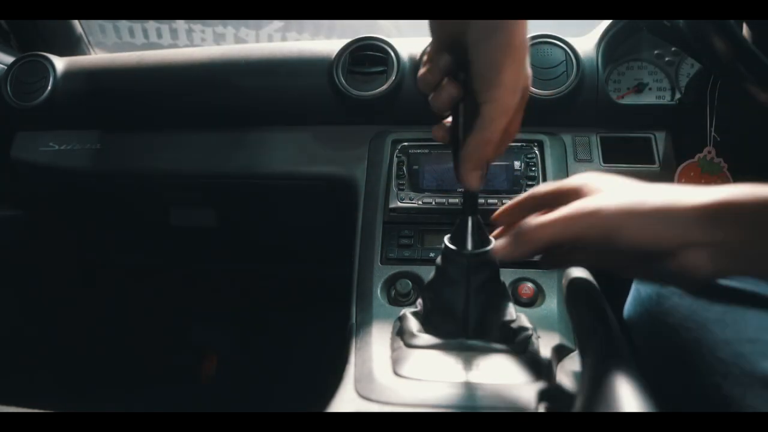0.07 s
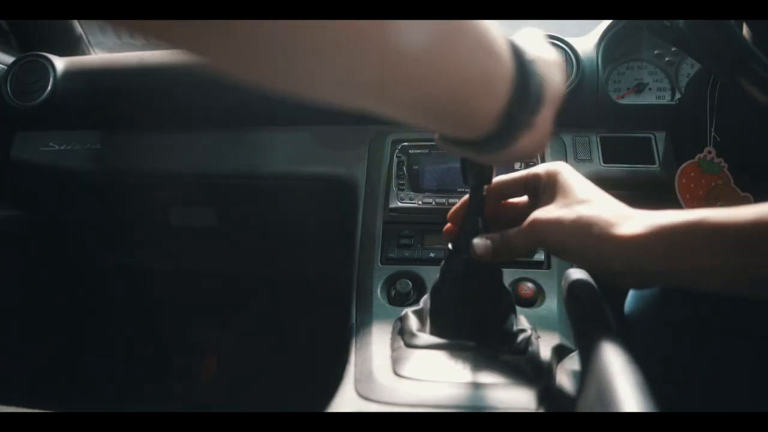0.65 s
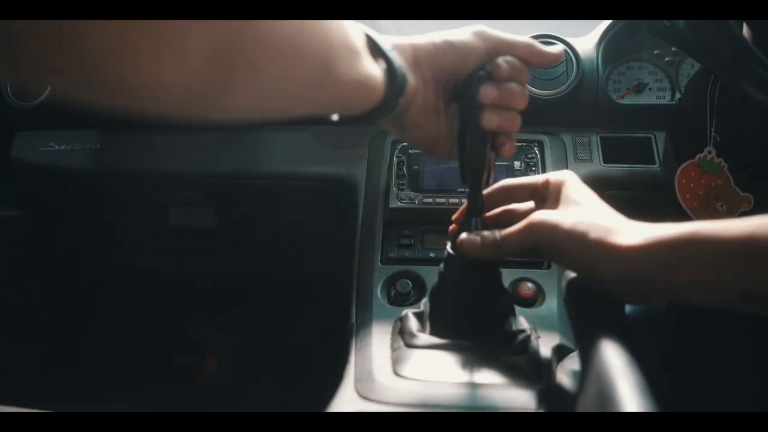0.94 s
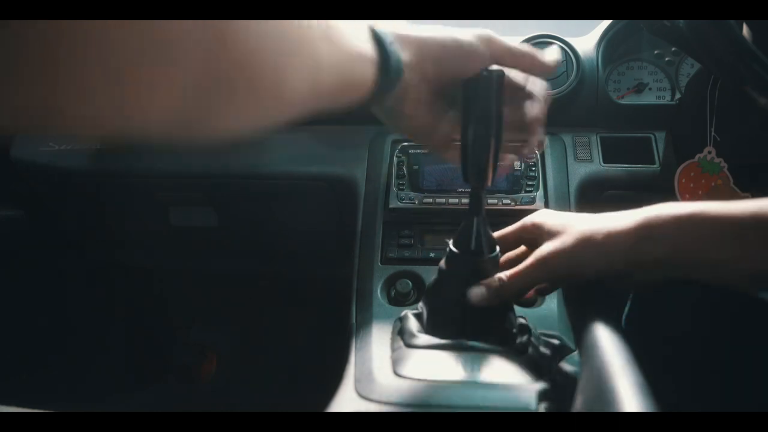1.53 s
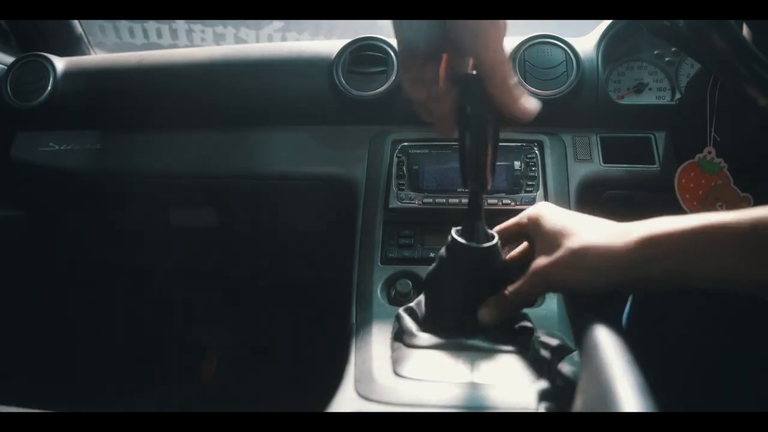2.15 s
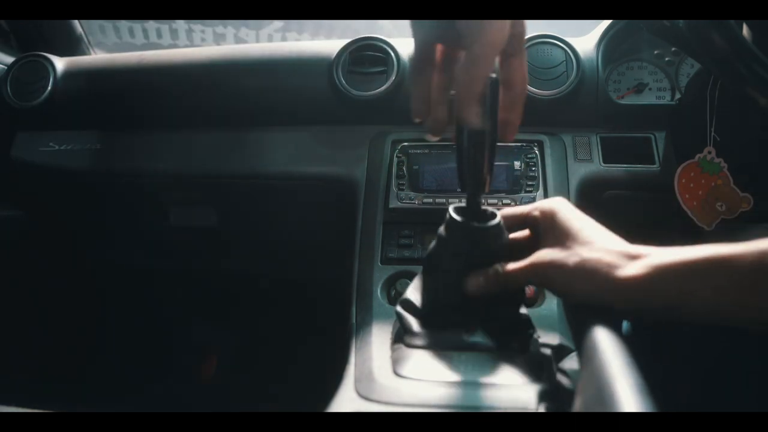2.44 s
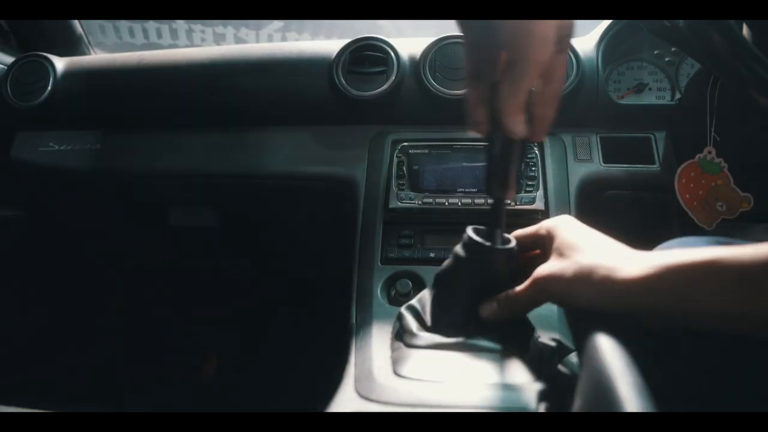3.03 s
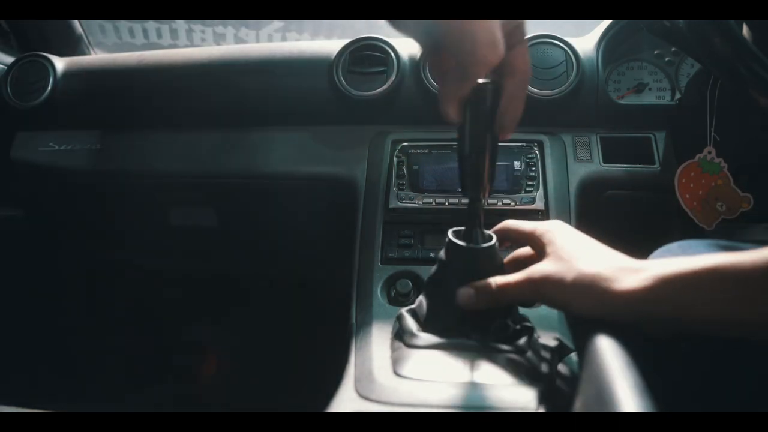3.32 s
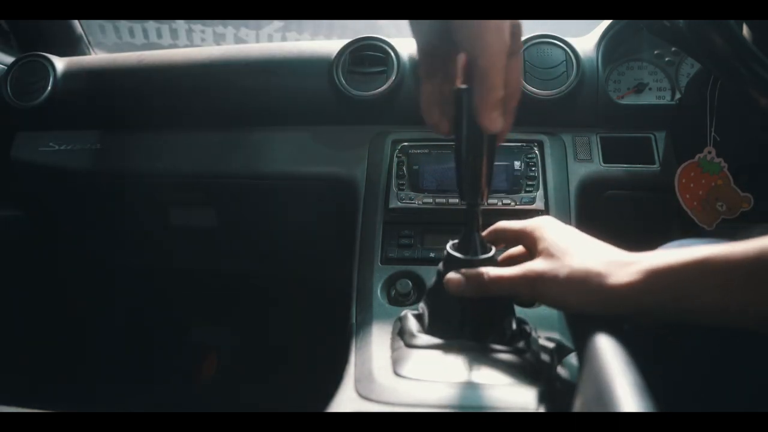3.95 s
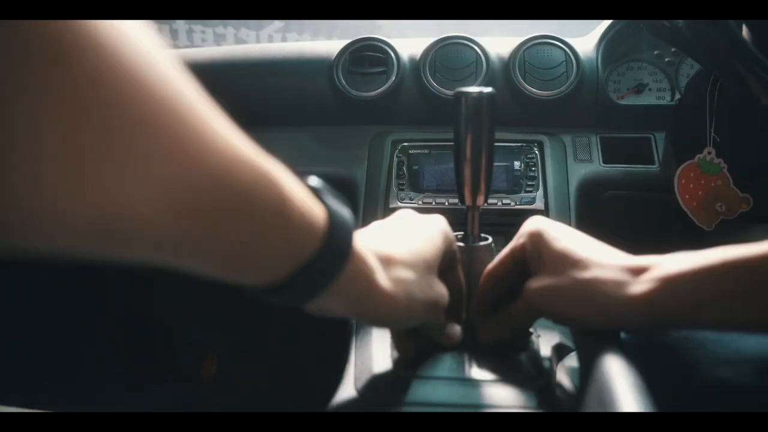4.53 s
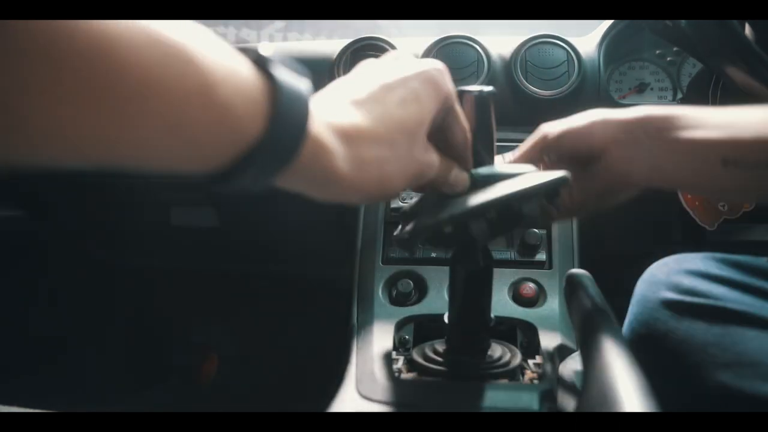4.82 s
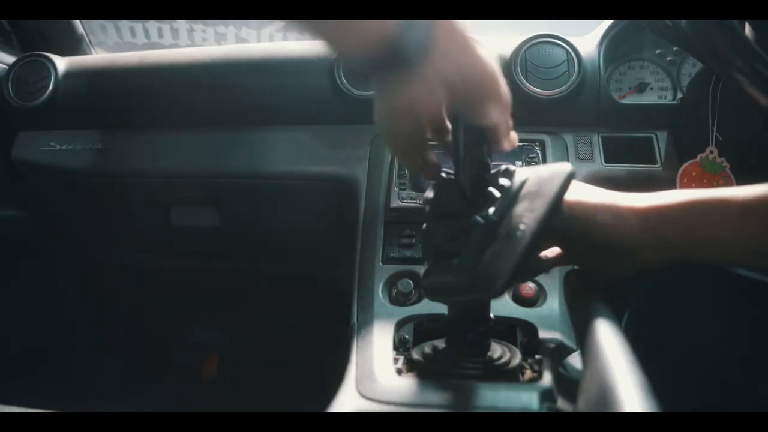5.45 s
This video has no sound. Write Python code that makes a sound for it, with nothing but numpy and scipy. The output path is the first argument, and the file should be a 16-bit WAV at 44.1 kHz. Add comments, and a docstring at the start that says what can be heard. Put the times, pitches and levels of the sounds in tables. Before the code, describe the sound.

Dull, cushioned knocks from a wobbling gear lever open the sound, heard from close by in a small, padded car cabin with a barely audible hum. Fingers scuff and tick on the knob while the rubber boot flexes, crinkles and briefly squeaks in quiet, uneven strokes. Late on comes the loudest event, a rapid burst of dry plastic clacks and cracks as console trim pops loose. A little more soft rubbing and ticking follows.

```python
"""First come dull knocks and soft rubbing over a faint low hum: in a parked car, two hands screw a knob
onto the gear lever and work the rubber boot (the sleeve around its base). The lever knocks because it
sits a little loose. Fingers rub and tick on knob and boot, and rubber catches and squeaks.
Near the end, plastic trim snaps out of its clips. The small padded cabin gives a brief echo."""
import sys
import numpy as np
from scipy import signal
from scipy.fft import rfft, irfft, next_fast_len
from scipy.io import wavfile
from scipy.ndimage import map_coordinates

SR = 44100
rng = np.random.default_rng(int(sys.argv[2]) if len(sys.argv) > 2 else 0)


def transcribe(signal):
    """Save signal, clipped to [-1, 1], as a 16-bit WAV file at the path in sys.argv[1]."""
    frames = np.atleast_2d(signal).T
    limited = np.clip(frames, -1, 1)
    pcm = np.round(limited * 32767).astype(np.int16)
    wavfile.write(sys.argv[1], SR, pcm)


N = 250488


def amp(db):
    """Turn decibels into a multiplier."""
    return 10 ** (np.asarray(db) / 20)


def unit(x):
    """Scale to an average power of 1."""
    return x / np.sqrt(np.mean(x ** 2) + 1e-20)


def peak_one(x):
    """Scale to a peak of 1."""
    return x / np.abs(x).max()


def along(points, hz):
    """Read between (f/Hz, value) points, with octaves evenly spaced."""
    f, v = np.transpose(points)
    return np.interp(np.log(hz + 1), np.log(f + 1), v)


def bumps(resonances, hz):
    """Boost in dB around each resonance, a pitch at which an object likes to ring."""
    return sum(db * np.exp(-(2 * (hz - centre) / width) ** 2) for centre, width, db in resonances)


def wobble(rate):
    """A smooth curve through `rate` random values a second."""
    return map_coordinates(rng.standard_normal(int(N * rate / SR) + 4), [np.arange(N) * rate / SR])


def colour(x, gain_db):
    """Turn each frequency up or down by gain_db(hz)."""
    size = 2 * next_fast_len(len(x))
    cepstrum = irfft(np.log(amp(gain_db(np.fft.rfftfreq(size, 1 / SR))) + 1e-6))
    # make the filter ring only after a sound, never before it
    cepstrum[1:size // 2] *= 2
    cepstrum[size // 2 + 1:] = 0
    return irfft(rfft(x, size) * np.exp(rfft(cepstrum)))[:len(x)]


def add(track, start, sound):
    """Mix a sound into the track, `start` seconds in."""
    part = track[max(round(start * SR), 0):][:len(sound)]
    part += sound[:len(part)]


def ring(tones, t, attack_s, scatter_db, choke=1):
    """A struck object's tones each drop 60 dB in their fade time; choke over 1 fades ever faster."""
    hz, db, fade_s = np.transpose(tones)[:, :, None]
    level = db + scatter_db * rng.standard_normal(hz.shape)
    waves = amp(level - 60 * (t / fade_s) ** choke) * np.sin(2 * np.pi * hz * t)
    return peak_one(waves.sum(axis=0) * (1 - np.exp(-t / attack_s)))


# the tone of the cabin's hum: f/Hz, level/dB
HUM_TONE = [(13, -37), (22, 0), (72, 8.5), (227, -10.5), (324, -0.5), (426, -12), (545, -4.5), (679, -19),
            (1050, -20), (1390, -31.5), (2150, -19), (2910, -21.5), (9200, -31), (13500, -32),
            (15500, -58.5)]

def cabin_hum():
    """The low hum and faint hiss of the still cabin."""
    return amp(-73) * unit(colour(rng.standard_normal(N), lambda hz: along(HUM_TONE, hz)))


# resonances of the lever's collar and the console around it: f/Hz, width/Hz, boost/dB
HOLLOW_RESONANCES = [(566, 90, 3.5), (790, 210, 4), (1037, 158, 5.5), (1950, 87, 1.5), (2550, 460, 1)]

def hollow(x, gain_db):
    """Give a touch its own tone plus the hollow ring of collar and console."""
    return colour(x, lambda hz: gain_db(hz) + bumps(HOLLOW_RESONANCES, hz))


def friction(tone, grains_per_s, grain_db):
    """Sliding makes smooth noise, with tiny grains where the surfaces stick and slip."""
    clumps = amp(6 * wobble(45))  # slips bunch up as folds buckle
    slips = (rng.random(N) < grains_per_s / SR * clumps) * rng.laplace(size=N)
    sliding = rng.standard_normal(N) + amp(grain_db) * unit(slips)
    return unit(hollow(sliding, lambda hz: along(tone, hz)))


# faint rubbing while the hands just hold on: t/s, level/dB
HOLDING = [(0, -71.5), (.5, -72.5), (.57, -78), (.95, -75), (1.24, -79), (1.4, -74), (1.72, -78),
           (2.13, -75), (2.38, -86), (2.62, -73.5), (2.8, -84.5), (3.33, -73.5), (3.53, -81.5), (3.7, -77),
           (4.05, -83.5), (4.7, -69), (4.97, -70), (5.33, -74.5), (5.68, -75)]
# hand strokes: t/s, length/s, level/dB, swell from start to end/dB, lightness of touch/dB
HAND_STROKES = [(0.086, 0.059, -65, 10.5, -6), (0.18, 0.069, -75.5, 7, -9), (0.347, 0.11, -70, -4, -7.5),
                (0.591, 0.062, -74.5, -2, -9), (0.766, 0.13, -70.5, -7.5, -5),
                (1.01, 0.086, -61, 12.5, -5.5), (1.106, 0.077, -66, -3.5, -2.5), (1.436, 0.12, -77, 8, 2.5),
                (1.763, .045, -67.5, 12.5, -3.5), (1.918, 0.13, -74.5, -15, -6),
                (2.187, 0.13, -68, 2, -1.5), (2.526, 0.12, -74, 0, 3), (2.868, 0.062, -75.5, 8.5, 5.5),
                (3.004, .07, -72.5, 1, 6), (3.083, 0.12, -70, -4.5, -2.5), (3.298, 0.021, -71, -5, 2.5),
                (3.419, 0.066, -70.5, -4, 4.5), (3.558, 0.04, -70, 12.5, 4.5), (3.605, 0.085, -72, 5, -2.5),
                (3.735, 0.052, -70.5, -6, 1), (3.862, 0.15, -75.5, 0.5, 1), (4.098, 0.078, -70.5, -1.5, -2),
                (4.224, 0.11, -67, 6.5, -3.5), (4.335, 0.026, -67.5, -8, 9), (4.461, 0.034, -59, 2, -1),
                (4.505, 0.076, -67.5, 4, -1.5), (4.596, 0.1, -54.5, -12, -7), (4.69, .26, -72, -12, 1.5),
                (5.014, 0.037, -64.5, 3, 5), (5.081, .15, -65, -1.5, 4.5), (5.444, .14, -73.5, 1, 3.5),
                (5.598, 0.067, -66.5, -10, -14)]

def hand_effort(per_lightness):
    """Loudness of holding plus strokes; each dB of lightness adds per_lightness dB."""
    t = np.arange(N) / SR
    rise_s, fall_s, hold_lightness_db = 0.0057, 0.0091, 1.5
    power = amp(np.interp(t, *np.transpose(HOLDING)) + per_lightness * hold_lightness_db) ** 2
    for start, length, db, swell_db, lightness_db in HAND_STROKES:
        near = slice(max(round((start - .1) * SR), 0), round((start + length + .1) * SR))
        age = t[near] - start
        fade_in = (1 + np.tanh(age / rise_s)) / 2
        fade_out = (1 - np.tanh((age - length) / fall_s - 1)) / 2
        progress = np.clip(age / length, 0, 1)
        level_db = db + swell_db * (progress - .5) + per_lightness * lightness_db
        power[near] += (fade_in * fade_out * amp(level_db)) ** 2
    return np.sqrt(power)


# the tone of a small tick, from a fold or a finger: f/Hz, level/dB
TICK_TONE = [(100, -24), (350, 6.5), (600, 10.5), (1000, 3.5), (1400, -3), (2000, -6.5), (3200, -12),
             (6000, -20), (10000, -21.5), (15000, -38)]

def crinkles(per_s):
    """The boot's folds give tiny ticks at random moments."""
    folds = (rng.random(N) < per_s / SR) * rng.standard_normal(N)
    return unit(hollow(folds, lambda hz: along(TICK_TONE, hz)))


# the tones of bending rubber, rubbed rubber, sliding skin and the sliding boot: f/Hz, level/dB
FLEX_TONE = [(60, -14.5), (110, -4.5), (160, -0.5), (220, -2.5), (380, 1.5), (560, -4.5), (800, -15.5),
             (1500, -43.5)]
RUB_TONE = [(250, -17), (500, -0.5), (800, 2.5), (1050, 2.5), (1350, 1), (2000, 0.5), (3000, -9),
            (4500, -13), (8000, -33.5)]
SKIN_TONE = [(1500, -25), (3000, 4), (4500, 1.5), (6500, -0.5), (8000, -4), (10000, -6.5), (12500, -13),
             (14300, -25), (15500, -46)]
BOOT_TONE = [(1500, -30.5), (3000, 6), (4500, 2.5), (6500, 2.5), (8000, 1.5), (10000, 1.5), (12000, -5.5),
             (15000, -13.5)]

def handling():
    """Rubber bends and rubs and skin slides in an uneven grip: firm strokes are dull, light ones hiss."""
    t = np.arange(N) / SR
    grip_db = 1.5 * wobble(28)
    hanging_free = np.interp(t, [4.85, 4.95], [0, 1])  # the boot bends less once it hangs free
    flex = amp(-1 - 10 * hanging_free) * friction(FLEX_TONE, grains_per_s=130, grain_db=-8)
    rub = friction(RUB_TONE, grains_per_s=600, grain_db=-3)
    crinkle = amp(-11.5) * crinkles(per_s=49)
    skin = friction(SKIN_TONE, grains_per_s=810, grain_db=-7.5)
    boot = friction(BOOT_TONE, grains_per_s=180, grain_db=-7)
    # as the boot is worked up the lever, its finer hiss takes over from the skin's
    lifted = np.interp(t, [3.4, 3.9], [0, 1])
    hiss = np.sqrt(1 - lifted) * skin + np.sqrt(lifted) * boot
    # a light touch bends the rubber less
    rubber = hand_effort(-0.53) * flex + hand_effort(0) * (rub + crinkle)
    return amp(grip_db) * rubber + amp(-9 + .5 * grip_db) * hand_effort(1) * hiss


# fingers, knob and collar touch: t/s, level/dB, bass/dB, treble/dB, fade time/s
TOUCHES = [(0.005, -51, 3, -8, .03), (0.3552, -46, -34, 2, .02), (0.382, -49.5, -7, -26, .14),
           (1.062, -37.5, 11, -2, 0.054), (1.0872, -43.5, 7, -12, 0.092), (1.155, -52, 19, -10, 0.02),
           (1.306, -53.5, -8, -2, 0.14), (1.425, -54, 5, -1, 0.063), (1.464, -58.5, -24, 1, .013),
           (1.512, -52.5, -15, -4, 0.01), (1.564, -57, 8, 0, 0.014), (1.677, -56, 3, -3, 0.012),
           (1.796, -51.5, -17, 0, 0.039), (1.811, -49, 5, 3, .045), (1.979, -51, 18, -15, .02),
           (2.187, -55, 13, -6, 0.14), (2.301, -49.5, -5, -20, 0.044), (2.3253, -46, -3.5, 1.5, 0.027),
           (2.448, -52.5, -11.5, -4, 0.12), (3.472, -47.5, -8.5, -6, 0.033), (3.735, -51.5, -8, -8, 0.11),
           (3.885, -45, -2.5, -3.5, 0.061), (3.972, -50, -7, -19, 0.049), (4.1342, -40.5, -12, 0, 0.028),
           (4.311, -48, -1, -2, 0.067), (4.404, -52, -18, -6, 0.05), (4.4146, -50, -12, -1.5, 0.066),
           (4.474, -45.5, 5, -9, 0.1), (4.529, -53.5, 7, -9, 0.022), (4.875, -56, -9, 8, 0.039),
           (5.147, -51, -2, -8, 0.049), (5.4192, -54.5, -35, 1, 0.0066), (5.5968, -48, -17, 2, 0.018),
           (5.611, -48, -8, -6, .03)]

def finger_ticks():
    """Short scuffs of noise: the harder the contact, the brighter the tick."""
    out, t = np.zeros(N), np.arange(-SR // 40, SR // 6) / SR
    for start, db, bass_db, treble_db, fade_s in TOUCHES:
        tilt = [(350, bass_db), (1000, 0), (2000, 0.0095), (6000, treble_db)]
        brush = np.exp(np.minimum(t, 0) / (0.042 * fade_s))  # a finger brushes before it lands
        fade = amp(-60 * np.maximum(t, 0) / fade_s)
        scuff = rng.standard_normal(len(t)) * brush * fade
        tick = hollow(scuff, lambda hz: along(TICK_TONE, hz) + along(tilt, hz))
        add(out, start + t[0], amp(db) * peak_one(tick))
    return out


# the tones of the lever on its linkage: f/Hz, level/dB, fade time/s
LEVER_TONES = [(333, 0, .025), (545, -5.5, .021), (170, -13, .022), (700, -14, .015), (420, -13, .016)]
# the loose lever knocks: t/s, level/dB, boost of its two highest tones/dB
LEVER_KNOCKS = [(0.0051, -31, -3.5), (0.1089, -42, -5), (0.134, -28, 3), (0.1439, -30, -6),
                (0.1547, -27, 2.5), (0.1783, -30.5, -7.5), (0.485, -51.5, -4), (1.0412, -31, 5),
                (1.059, -41, 15), (1.078, -33.5, 5), (1.092, -37, -5), (1.103, -46, -2), (1.544, -56, -5),
                (1.6751, -52.5, -5), (1.795, -44.5, 6), (1.978, -51.5, 1.5), (2.644, -52, -2),
                (2.676, -58.5, -6), (4.333, -49.5, 1), (4.809, -48.5, -1)]

def lever_knocks():
    """Each cushioned knock rings for a few vibrations before the hand stops it."""
    out, t = np.zeros(N), np.arange(SR // 12) / SR
    for start, db, upper_db in LEVER_KNOCKS:
        tones = [(hz, level + upper_db * (k % 2), fade_s)
                 for k, (hz, level, fade_s) in enumerate(LEVER_TONES)]
        add(out, start, amp(db) * ring(tones, t, attack_s=.0015, scatter_db=1, choke=2.6))
    band_hz = (133, 810)  # the slim, cushioned lever gives off little sound outside this range
    return signal.sosfilt(signal.butter(2, band_hz, "band", fs=SR, output="sos"), out)


# how long the cabin echoes: f/Hz, fade time/s
ECHO_FADES = [(150, 0.23), (1000, 0.018), (10000, 0.02)]

def cabin_echo(x):
    """Dashboard and glass bounce the sound back as a short, dense tail."""
    hz, t, noise = signal.stft(rng.standard_normal(SR // 4), SR, nperseg=256)
    fade = amp(-60 * t / along(ECHO_FADES, hz)[:, None])
    tail = signal.istft(noise * fade, SR, nperseg=256)[1]
    delayed = np.pad(x, (SR // 300, 0))
    return signal.fftconvolve(delayed, tail / np.linalg.norm(tail))[:N]


# rubber catches on the lever: t/s, level/dB, f/Hz, length/s
RUBBER_SQUEAKS = [(0.092, -54.5, 676, .025), (0.104, -59.5, 2600, 0.064), (0.368, -52, 800, 0.035),
                  (3.101, -64.5, 2170, 0.19), (3.415, -70, 10900, 0.075), (3.847, -72, 9900, 0.16),
                  (4.472, -44.5, 1660, 0.011), (4.473, -47, 2400, 0.013), (4.981, -63, 5270, 0.014),
                  (5.038, -57, 1690, 0.02), (5.138, -53, 970, 0.038), (5.16, -45.5, 388, 0.011),
                  (5.61, -49.5, 2400, 0.0078)]

def rubber_squeaks():
    """Quick, uneven slips ring around one pitch, swelling fast and then fading."""
    out, t = np.zeros(N), np.arange(SR // 3) / SR
    for start, db, centre_hz, length in RUBBER_SQUEAKS:
        progress = t / length
        slips = rng.standard_normal(len(t)) * progress * np.exp(-4 * progress)
        chirp = colour(slips, lambda hz: -20 * np.log10(1 + ((hz / centre_hz - 1) / 0.12) ** 2))
        add(out, start, amp(db) * peak_one(chirp))
    return out


# resonances of the plastic panel: f/Hz, width/Hz, boost/dB
PANEL_RESONANCES = [(377, 58, 6), (543, 55, 9.5), (812, 51, 4.5), (1072, 97, 8.5), (1390, 55, 10),
                    (1628, 220, 16), (2050, 720, 7.5), (2500, 68, 3), (2870, 180, 11), (3280, 81, 9.5)]
# the tone of a clack: multiple of its centre frequency, level/dB
CLACK_TONE = [(.03, -54), (.1, -40), (.3, -11.5), (.62, -11), (.85, 0.5), (1, 3), (1.22, -3), (1.55, -26),
              (2.5, -38), (4, -32.5), (9, -57.5)]
# the tone of a crack: f/Hz, level/dB
CRACK_TONE = [(300, -32), (900, 14), (2000, 3), (3200, -0.5), (5000, -12.5), (7500, -9), (9500, -12.5),
              (12000, -18.5), (15500, -29)]
# the clips let go: t/s, level/dB, crack compared with clack/dB, clack's centre f/Hz
CLIP_SNAPS = [(4.6004, -17, -8, 790), (4.6039, -29, 7, 2050), (4.6077, -20, -21, 860),
              (4.6104, -19, -18, 955), (4.6145, -25, -28, 930), (4.6375, -38, -17.5, 810),
              (4.6546, -33, -3, 1140), (4.6605, -31.5, 0.5, 1660), (4.6619, -18.5, -31, 960),
              (4.6697, -26, -22, 905)]

def trim_snaps():
    """Each clip gives a dry clack (one sharp blow, then the loose panel chatters) and a bright crack."""
    out, t = np.zeros(N), np.arange(SR // 4) / SR
    for start, db, crack_db, centre_hz in CLIP_SNAPS:
        chatter = rng.standard_normal(len(t)) * amp(-60 * t / 0.031)
        blow = (t == 0) + amp(-2.5) * chatter / np.linalg.norm(chatter)
        tone = [(multiple * centre_hz, level) for multiple, level in CLACK_TONE]
        clack = colour(blow, lambda hz: along(tone, hz) + bumps(PANEL_RESONANCES, hz))
        burst = rng.standard_normal(len(t)) * amp(-60 * t / 0.028) * (1 - np.exp(-t / 0.0018))
        crack = colour(burst, lambda hz: along(CRACK_TONE, hz))
        add(out, start, amp(db) * (peak_one(clack) + amp(crack_db) * peak_one(crack)))
    return out


# the tones of the hollow console: f/Hz, level/dB, fade time/s
CONSOLE_TONES = [(72, -9, .16), (105, -10, .12), (180, -6, .08), (235, -3, .08), (335, 0, .08),
                 (400, -3, .06), (500, -2, .06)]
# the console's thuds: t/s, level/dB
CONSOLE_THUDS = [(4.602, -37), (4.643, -42), (4.666, -39), (4.685, -61)]

def console_thuds():
    """The hollow console rings low under the snapping trim."""
    out, t = np.zeros(N), np.arange(SR // 4) / SR
    for start, db in CONSOLE_THUDS:
        add(out, start, amp(db) * ring(CONSOLE_TONES, t, attack_s=0.015, scatter_db=2))
    return out


def scene():
    """Everything heard from close by, in mono; only snaps, thuds, ticks and squeaks echo."""
    echoing = trim_snaps() + console_thuds() + finger_ticks() + rubber_squeaks()
    return (lever_knocks() + echoing + amp(-20.5) * cabin_echo(echoing) + handling() + cabin_hum())[None]


def record(dry):
    """Cut off the very highest treble."""
    top_hz = 15700
    size = next_fast_len(N + SR // 4)
    kept = np.fft.rfftfreq(size, 1 / SR) < top_hz
    return irfft(rfft(dry, size) * kept, size)[..., :N]


dry = scene()
out = record(dry)
transcribe(out)
```